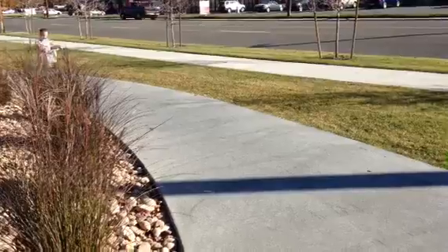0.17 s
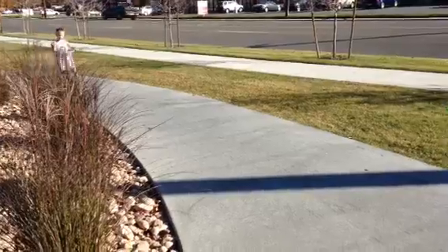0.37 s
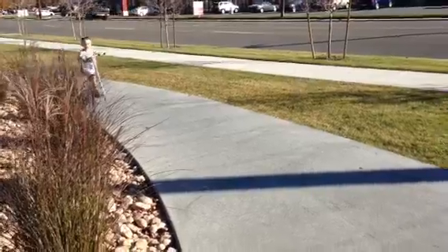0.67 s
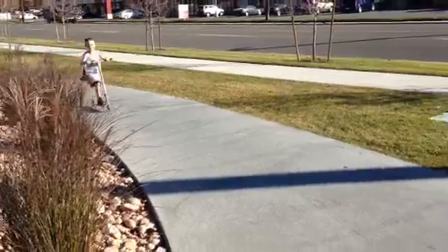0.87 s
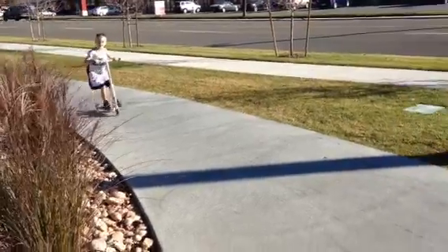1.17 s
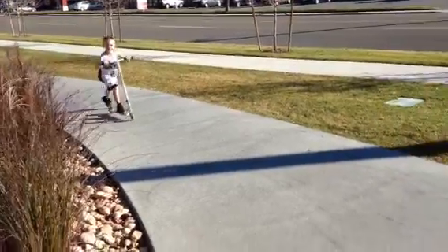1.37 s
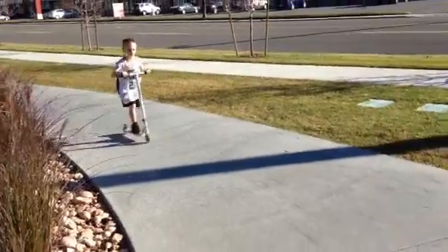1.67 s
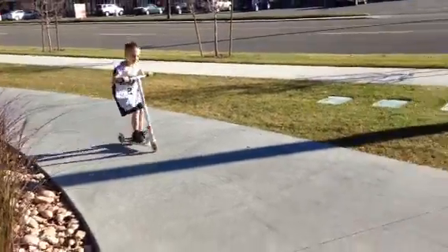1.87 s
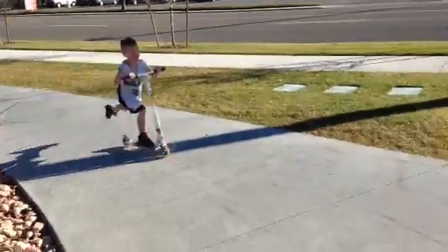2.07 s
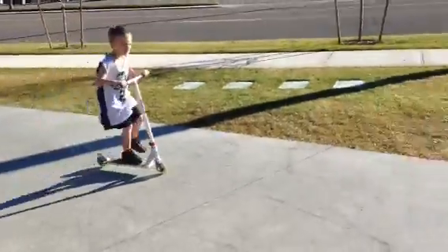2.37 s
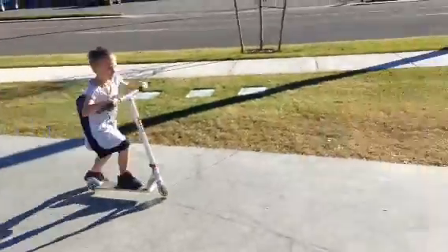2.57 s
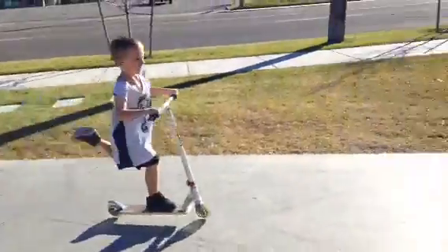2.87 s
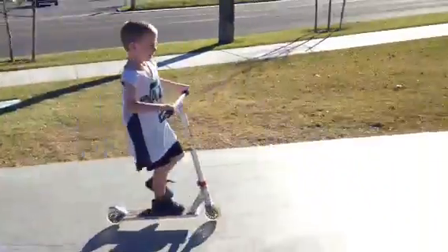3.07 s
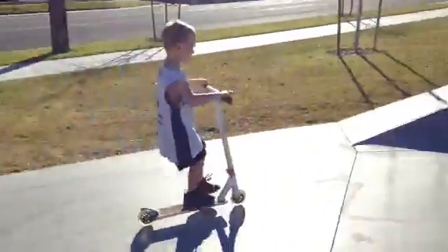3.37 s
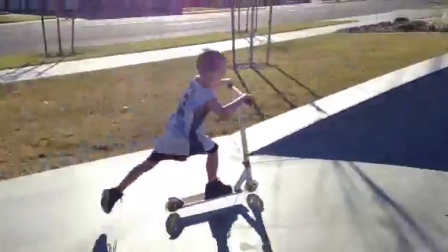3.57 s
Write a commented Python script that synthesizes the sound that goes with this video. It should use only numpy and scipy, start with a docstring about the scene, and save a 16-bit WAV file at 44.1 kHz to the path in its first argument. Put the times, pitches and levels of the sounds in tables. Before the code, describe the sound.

Kick scooter wheels on a concrete path start faint under traffic hiss and engine drone, then grow louder with gritty rolling, loose rattles and clicks, ending with a hard deck slap; outdoors, one microphone beside the path.

```python
"""After a brief silence, traffic hiss and rumble, an engine drone from beyond a lawn and faint wheel grit start together.
The wheels of a small kick scooter on a concrete path fade until 1 s, then grow louder, with rattles, at the one
microphone. Shaped noise makes the traffic and the microphone's hiss; fuzzy sagging partials make the engine, random
grit the wheels, noise bands the bearings. Struck modes make the loose frame's rattles and the deck's slap;
clicks, low thumps and a soft swish join in."""
import sys
import numpy as np
from scipy import signal
from scipy.fft import rfft, irfft, next_fast_len
from scipy.io import wavfile
from scipy.ndimage import uniform_filter1d, map_coordinates

SR = 44100
rng = np.random.default_rng(int(sys.argv[2]) if len(sys.argv) > 2 else 0)


def int16_out(signal):
    """Quantize to a 16-bit WAV file."""
    q = np.round(np.clip(np.atleast_2d(signal).T, -1, 1) * 32767)
    wavfile.write(sys.argv[1], SR, q.astype(np.int16))


def undo_db(level):
    """Turn decibels back into plain size, where 20 dB means ten times bigger."""
    steps = np.asarray(level, float) / 20
    return 10 ** steps


N = 163611  # length in samples


def unit(x):
    """Scale to rms 1."""
    return x / np.sqrt(np.mean(x ** 2) + 1e-20)


def curves(rows):
    """One value per sample for each column after the time."""
    s, *cols = np.transpose(rows)
    return [np.interp(np.arange(N) / SR, s, c) for c in cols]


def wobble(rate_hz):
    """A smooth random curve through rate_hz random knots a second."""
    knots = rng.standard_normal(int(N * rate_hz / SR) + 4)
    return map_coordinates(knots, [np.arange(N) * rate_hz / SR])


def coloured(x, points):
    """Shape the spectrum of x by (f/Hz, level/dB) points, joined on a log frequency axis; rms 1."""
    m = next_fast_len(N + 8192)
    hz, level_db = np.transpose(points)
    bins_hz = np.fft.rfftfreq(m, 1 / SR)
    gain = undo_db(np.interp(np.log(bins_hz + 1), np.log(hz + 1), level_db))
    return unit(irfft(rfft(x, m) * gain, m)[:N])


def patchy(depth_db):
    """White noise with soft patches of random gain over time and frequency."""
    z = signal.stft(rng.standard_normal(N), nperseg=1024)[2]
    field = uniform_filter1d(rng.standard_normal(z.shape), size=5, axis=0)
    field = uniform_filter1d(field, size=4, axis=1)
    return signal.istft(z * undo_db(depth_db * unit(field)), nperseg=1024)[1][:N]


def flickering_band(rows, hz, width_hz):
    """A fuzzy band of noise around hz whose level flickers."""
    peak = [(hz + k * width_hz, -8 * abs(k)) for k in (-4, 0, 4)]
    level = undo_db(curves(rows)[0] + 2.6 * wobble(60))
    return level * coloured(rng.standard_normal(N), peak)


def add(out, s, sound):
    """Mix a sound in at s seconds."""
    part = out[round(s * SR):][:len(sound)]
    part += sound[:len(part)]


# Spectrum of the microphone's own noise: f/Hz, level/dB per Hz
HISS_COLOUR = [(1000, 6.5), (5000, -1.5), (8000, -4), (16000, -5)]


def microphone_hiss():
    """Steady noise of the microphone itself."""
    return undo_db(-66) * coloured(rng.standard_normal(N), HISS_COLOUR)


# Traffic hiss from beyond the lawn: t/s, level/dB
ROAD = [(.1, -51), (.6, -51.5), (1.2, -54.5), (1.9, -56), (2.6, -58.5), (3.2, -58), (3.7, -53)]
# Its spectrum: f/Hz, level/dB per Hz
ROAD_COLOUR = [(200, -24), (330, -2.5), (700, 0), (1050, -0.5), (1600, -4.5), (2400, -12.5), (3500, -19),
               (4500, -27.5), (7000, -54)]


def traffic_hiss():
    """Tyre hiss: patchy noise that swells a little."""
    level = undo_db(curves(ROAD)[0] + 0.35 * wobble(2.6))
    return level * coloured(patchy(depth_db=2.0), ROAD_COLOUR)


# Traffic rumble from beyond the lawn: t/s, level/dB
RUMBLE = [(.1, -44), (.8, -47.5), (1.6, -47.5), (2.1, -50), (2.7, -49), (3.3, -51), (3.55, -49.5),
          (3.7, -55.5)]
# Its spectrum: f/Hz, level/dB per Hz
RUMBLE_COLOUR = [(20, -53), (60, -20), (90, -18.5), (110, -8), (160, 0), (210, 0.5), (270, -7.5),
                 (350, -13), (450, -31.5), (600, -51.5)]


def traffic_rumble():
    """Broad low noise that swells a little, faster than the hiss."""
    level = undo_db(curves(RUMBLE)[0] + 0.8 * wobble(12))
    return level * coloured(patchy(depth_db=0.7), RUMBLE_COLOUR)


# Engine driving away: t/s, f/Hz of the base pitch, relative level/dB
DRONE = [(.1, 115, -48.5), (1.2, 114.4, -46), (1.8, 113.1, -47), (2.2, 107.6, -49), (2.55, 101.8, -51),
         (3.7, 94.5, -68)]
# Its partials: multiple of the base pitch, relative level/dB, t/s at which it has half faded
DRONE_LINES = [(1, -3, 2), (1.369, -5.5, 1.91), (1.74, -5.5, 2.6), (2, 1, 2.5), (2.5, -16, 2.5),
               (4.08, -18, 1.7)]


def engine():
    """Fuzzy partials that sag in pitch and drop out as the vehicle leaves."""
    blur_hz, steady, fade_s = 15, 1.25, .15
    pitch_hz, level_db = curves(DRONE)
    phase = 2 * np.pi * np.cumsum(pitch_hz) / SR
    t, out = np.arange(N) / SR, 0
    for multiple, db, end_s in DRONE_LINES:
        # a steady part plus random drift of size and phase
        blur = steady + wobble(blur_hz) + 1j * wobble(blur_hz)
        partial = np.real(blur * np.exp(1j * multiple * phase))
        out = out + undo_db(db) * partial / (1 + np.exp((t - end_s) / fade_s * 4))
    return undo_db(level_db - 4.0) * out


# Soft high swish near the path: t/s, level/dB
SWISH = [(1.05, -92), (1.11, -76), (1.3, -75), (1.4, -89)]


def swish():
    """A soft flickering noise band, perhaps a shoe scuffing."""
    return flickering_band(SWISH, hz=7700, width_hz=1100)


# Low thumps at the microphone: t/s, level/dB scaling each pulse
THUMPS = [(1.64, -47), (3.34, -58)]


def thumps():
    """Soft low pushes, shoe or wind puffs: a sine under a pulse that swells and dies."""
    hz, swell_s = 65, .008
    out, t = np.zeros(N), np.arange(SR // 8) / SR
    pulse = np.exp(1) * t / swell_s * np.exp(-t / swell_s)
    for s, db in THUMPS:
        add(out, s, undo_db(db) * pulse * np.sin(2 * np.pi * hz * t))
    return out


# Modes of the scooter's frame: f/Hz, relative level/dB, 60 dB decay t/s
FRAME = [(775, 11, 0.0071), (1263, 5.5, 0.013), (1490, 6.5, 0.016), (1896, 0.5, 0.02), (2138, 2, 0.011),
         (2640, -7.5, 0.016), (3085, 0.5, .012), (3525, -7, 0.021), (3926, 0.5, 0.013), (4397, -8, 0.022),
         (4670, -13, 0.024), (5500, -13, 0.0038), (6800, -7.5, 0.0029)]


def frame_ring(tilt_db):
    """One knock on the frame: decaying modes, newly weighted each time; tilt in dB per octave."""
    scatter_db, contact_s = 2.5, 0.00031
    t, ring = np.arange(SR // 25) / SR, 0
    for k, (hz, db, t60) in enumerate(FRAME):
        start_db = db + tilt_db * np.log2(hz / 2500) + scatter_db * rng.standard_normal()
        ring = ring + (-1) ** k * undo_db(start_db - 60 * t / t60) * np.sin(2 * np.pi * hz * t)
    return ring * (1 - np.exp(-t / contact_s))  # softened by the contact


def rattle(peak_db, length_s, tilt_db):
    """A dense dying run of ticks in the loose joints, with a weaker after-shake, ringing the frame."""
    ticks_hz, after_db, after_s = 1700, -7.5, 0.017
    t = np.arange(SR // 12) / SR
    shake = np.exp(-(t / length_s) ** 2) + undo_db(after_db) * np.exp(-t / after_s)
    ticks = (rng.random(len(t)) < ticks_hz / SR) * rng.standard_normal(len(t)) * shake
    ticks[0] = 1.7  # the first knock
    sound = signal.fftconvolve(ticks, frame_ring(tilt_db))
    return undo_db(peak_db) * sound / np.abs(sound).max()


# Whine of a wheel bearing: t/s, level/dB
WHINE = [(2.3, -85), (2.52, -70), (2.8, -63), (3.03, -65), (3.12, -72), (3.7, -73)]
# A higher bearing tone: t/s, level/dB
SIZZLE = [(2.8, -95), (2.9, -80), (3.1, -70), (3.13, -99)]


def bearings():
    """Two fuzzy wheel bearing tones, made of narrow noise bands."""
    return flickering_band(WHINE, hz=3000, width_hz=130) + flickering_band(SIZZLE, hz=4600, width_hz=130)


# Wheels on the concrete, fading until 1 s and then growing louder: t/s, level/dB
ROLL = [(.1, -60), (1, -74), (1.8, -63), (2.3, -62), (2.6, -58.5), (2.9, -58.5), (3.2, -57.5),
        (3.45, -55.5), (3.7, -59.5)]
# Spectrum of the grinding: f/Hz, level/dB per Hz
ROLL_COLOUR = [(250, -25), (400, -0.5), (700, -3), (1150, 0.5), (1600, -4.5), (2300, -6.5), (3300, -8.5),
               (4600, -18), (5300, -19.5), (9000, -43)]


def wheels():
    """Grit under hard wheels and small chance rattles, both following the rolling level."""
    grit_hz, spread_db = 1500, 0.5  # mean grains a second; mean of their exponential spread
    loose_hz, loose_db = 60, 4.5  # chance rattles a second; mean peak over the rolling level
    present = rng.random(N) < grit_hz / SR
    size = undo_db(-spread_db * np.log(rng.random(N) + 1e-9))
    grit = present * size * rng.standard_normal(N)
    out = undo_db(2.6 * wobble(30.14)) * coloured(grit + 0.12 * patchy(depth_db=3.5), ROLL_COLOUR)
    for s in np.arange(0, N / SR, 1 / loose_hz):
        jitter, strength, tone = rng.standard_normal(3)
        knock = rattle(loose_db + 3 * strength, length_s=0.0015, tilt_db=-0.5 + 2.9 * tone)
        add(out, abs(s + jitter / loose_hz), knock)
    return undo_db(curves(ROLL)[0]) * out


# Hard single clicks: t/s, peak level/dB, centre f/Hz, octaves to each side, level/dB of the ring fed in
CLICKS = [(0.6405, -41, 4200, .75, -16), (.665, -53, 6900, .2, -18), (2.5893, -31.5, 2600, 1.75, -20)]


def clicks():
    """Hard contacts: an impulse and dying noise, with a short ring of the frame, through one band."""
    t60_s = 0.024
    out, t = np.zeros(N), np.arange(SR // 25) / SR
    for s, db, hz, octaves, ring_db in CLICKS:
        edges_hz = np.clip([hz * 2 ** -octaves, hz * 2 ** octaves], 100, 20000)
        band = signal.butter(3, edges_hz, "band", fs=SR, output="sos")
        burst = 0.15 * undo_db(-60 * t / t60_s) * rng.standard_normal(len(t))
        burst[0] = -2
        crack = signal.sosfilt(band, burst + undo_db(ring_db) * frame_ring(tilt_db=-0.5))
        add(out, s, undo_db(db) * crack / np.abs(crack).max())
    return out


# Modes of the scooter's deck: f/Hz, relative level/dB, 60 dB decay t/s
DECK = [(830, -6, .022), (1620, -3, .016), (2150, 0, .008), (2650, -6, .006), (3300, 1, .011),
        (4100, -14, .008), (7500, -15, .007), (9000, -17, .005)]


def clack():
    """The deck slaps once, hard: its short modes crest together just after contact."""
    start_s, peak_db, crest_s = 3.49865, -20.5, .00036
    out, t = np.zeros(N), np.arange(SR // 25) / SR
    ring = sum(undo_db(db - 60 * t / t60) * np.cos(2 * np.pi * hz * (t - crest_s)) for hz, db, t60 in DECK)
    ring = ring * np.clip(2 * t / crest_s, 0, 1)  # full halfway to the crest
    add(out, start_s, undo_db(peak_db) * ring / np.abs(ring).max())
    return out


# Rattles of the loose frame: t/s, peak level/dB, length t/s, tilt/dB per octave
RATTLES = [(.353, -42, 0.002, -2), (1.315, -42, .003, -1.5), (1.954, -40.5, .0026, -3),
           (2.042, -48, 0.035, 11), (2.377, -42.5, .0097, -2), (2.479, -32.5, .0025, -0.5),
           (2.485, -43.5, 0.0025, 11), (2.567, -42, .009, 0), (2.644, -36, 0.0056, 0.5),
           (2.654, -32, 0.012, 3.5), (2.805, -43, 0.0039, 3), (2.853, -51, 0.0048, 6),
           (2.893, -38.5, 0.0015, 0.5), (2.904, -40.5, 0.0036, -3), (2.913, -38, 0.0088, -0.5),
           (2.988, -41, .003, 2), (2.998, -40, 0.0048, 1), (3.084, -35, 0.0042, -0.5),
           (3.104, -42.5, .004, 1.5), (3.176, -31, .005, 3.5), (3.358, -40, 0.0054, 0),
           (3.421, -47, .002, 7), (3.446, -38, .005, 1), (3.503, -48, 0.0048, 6), (3.527, -40, .03, 2),
           (3.603, -34, 0.0022, -0.2)]


def rattles():
    """Bumps in the path shake the scooter, and its loose joints ring the frame."""
    out = np.zeros(N)
    for s, db, length_s, tilt_db in RATTLES:
        add(out, s, rattle(db, length_s, tilt_db))
    return out


def scene():
    """Everything around the microphone, one channel."""
    background = traffic_hiss() + traffic_rumble() + engine()
    nearby = swish() + thumps()
    scooter = bearings() + wheels() + clicks() + clack() + rattles()
    return (background + nearby + scooter)[None]


def low_pass(x):
    """Removes everything above the highest recorded frequency."""
    return signal.sosfilt(signal.butter(12, 15590, fs=SR, output="sos"), x)


def record(dry):
    """Adds the microphone's hiss, opens the sound abruptly and limits the band."""
    start_s, fade_s, top_hz = 0.083, 0.00082, 15400
    x = dry + microphone_hiss()
    gate = np.clip((np.arange(N) / SR - start_s) / fade_s, 0, 1)
    spectrum = rfft(x * gate) * (np.fft.rfftfreq(N, 1 / SR) < top_hz)
    return low_pass(irfft(spectrum, N))


dry = scene()
out = record(dry)
int16_out(out)
```